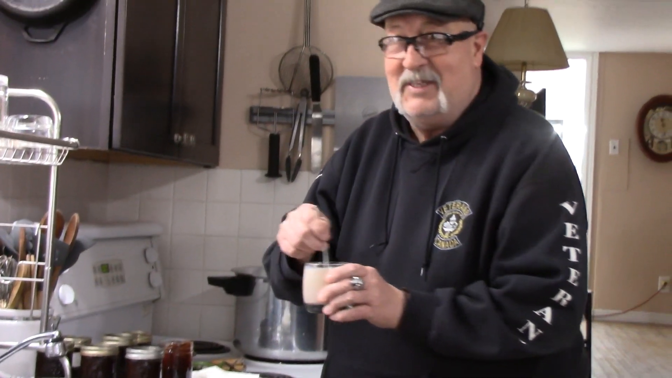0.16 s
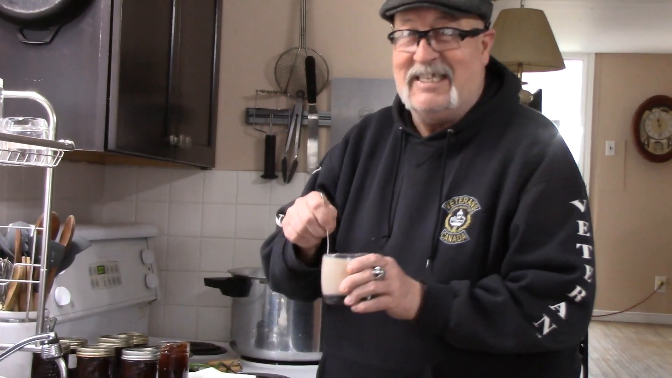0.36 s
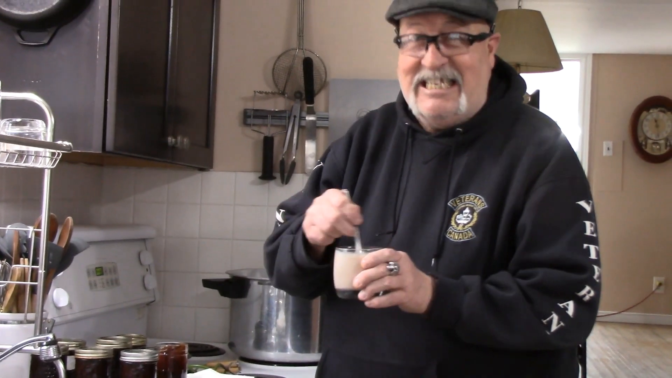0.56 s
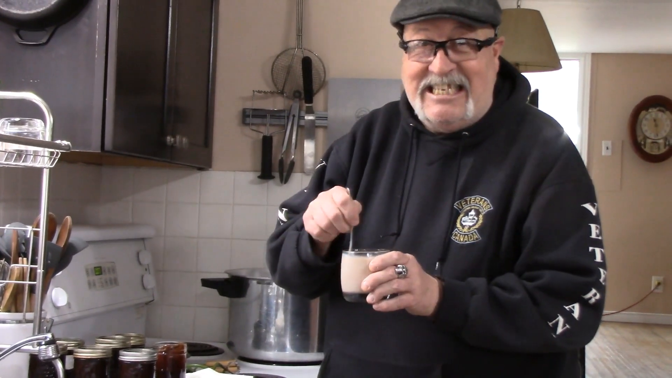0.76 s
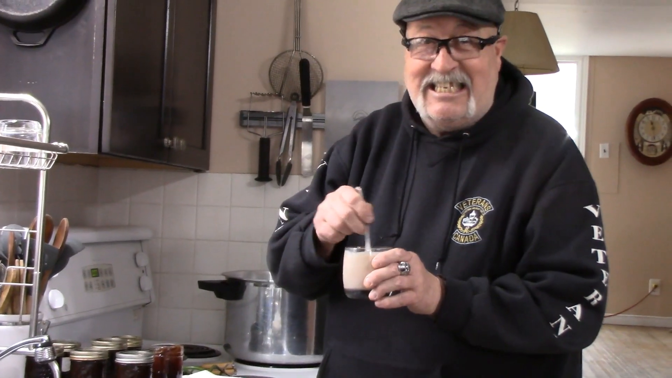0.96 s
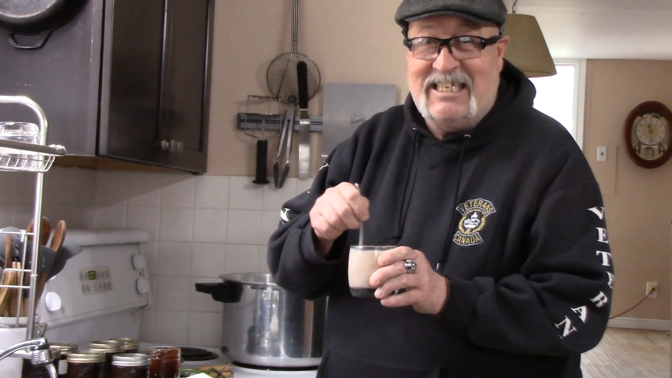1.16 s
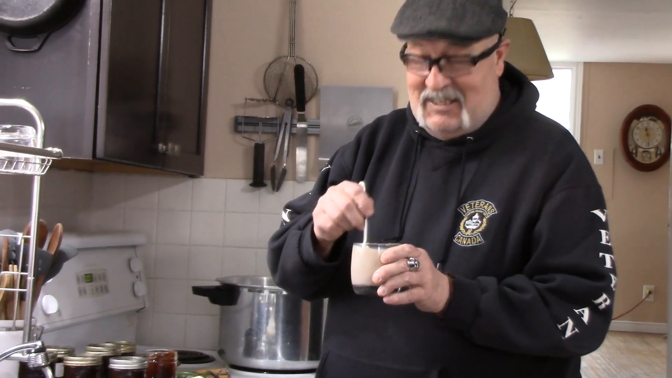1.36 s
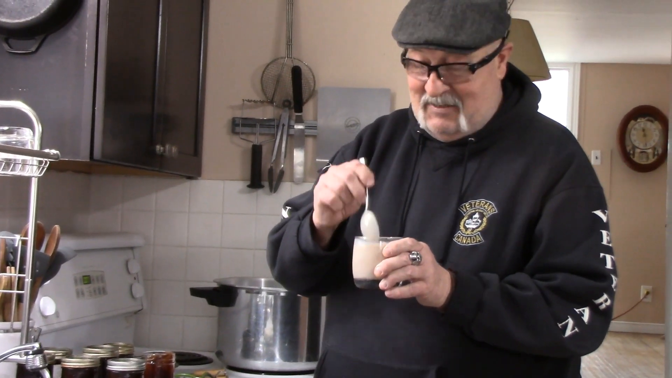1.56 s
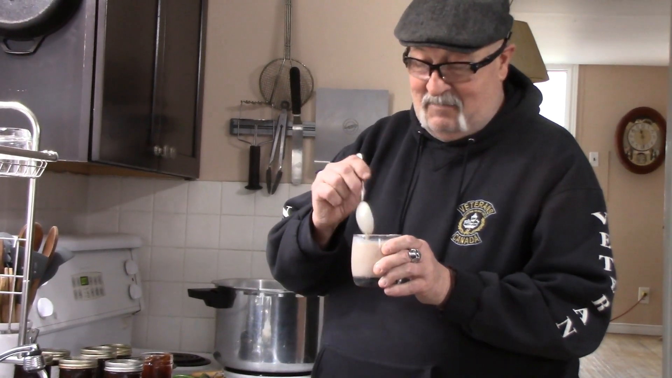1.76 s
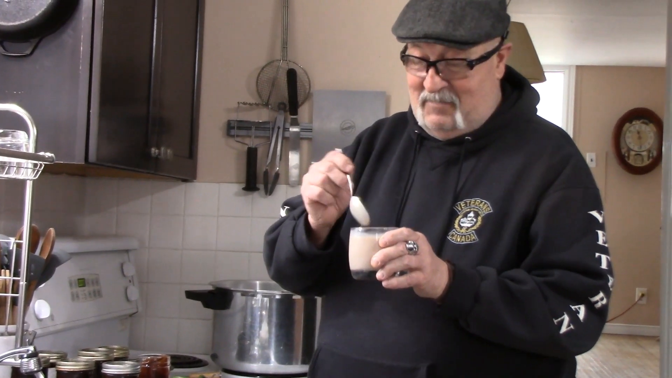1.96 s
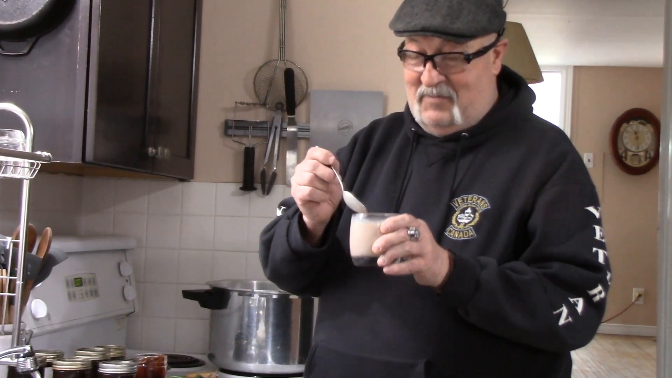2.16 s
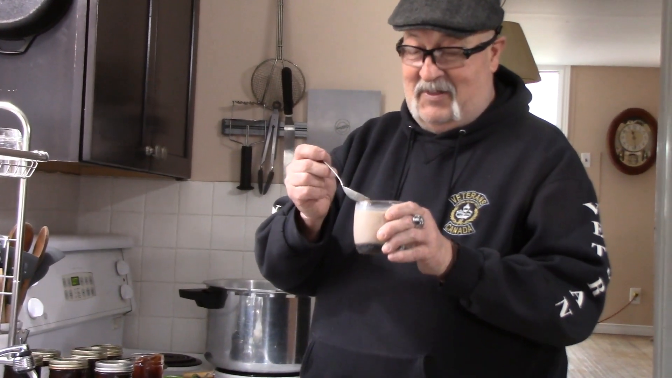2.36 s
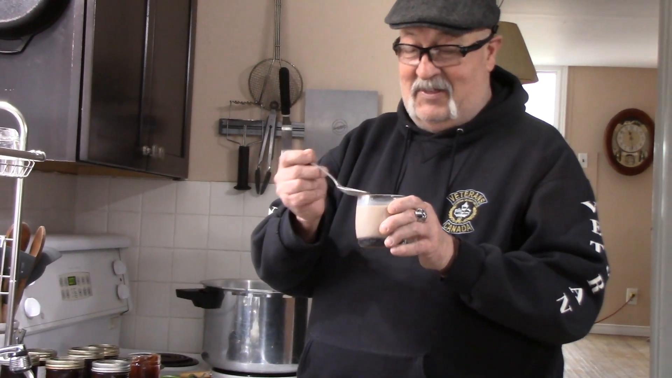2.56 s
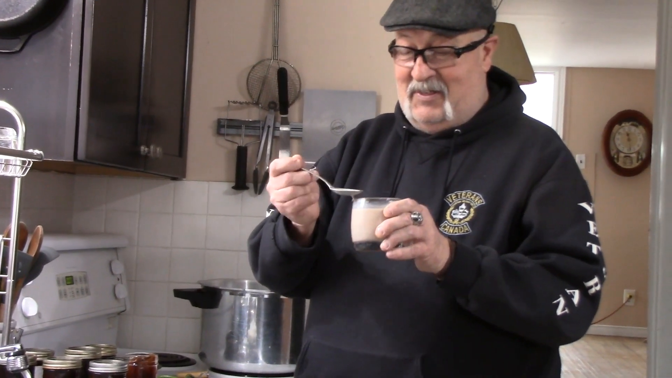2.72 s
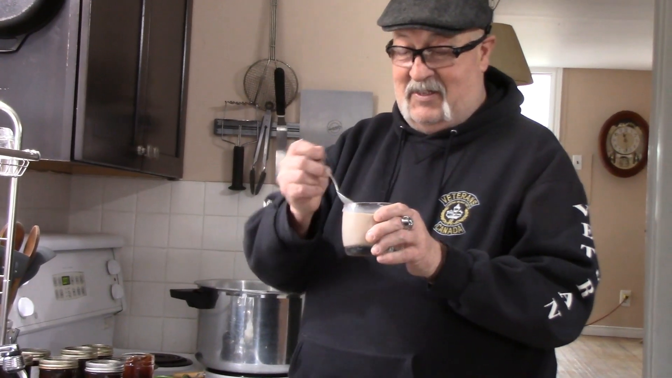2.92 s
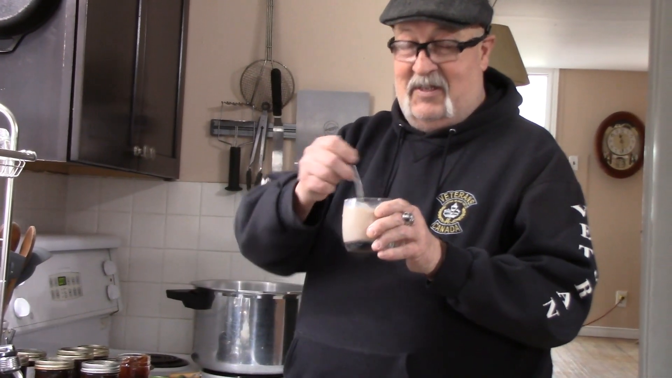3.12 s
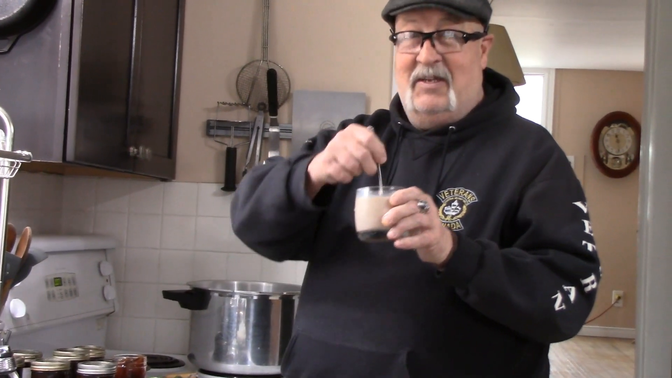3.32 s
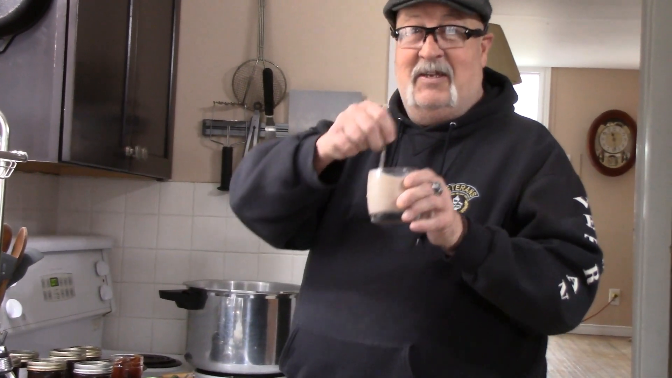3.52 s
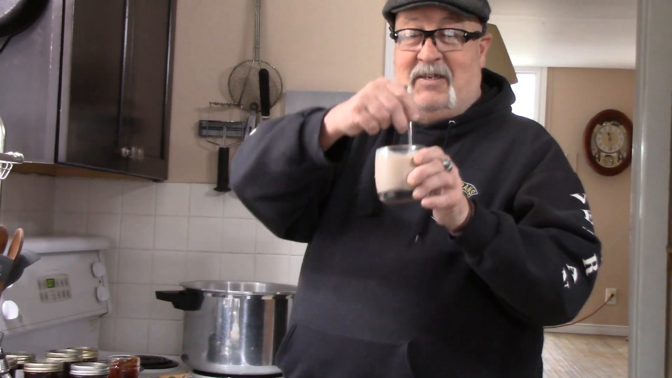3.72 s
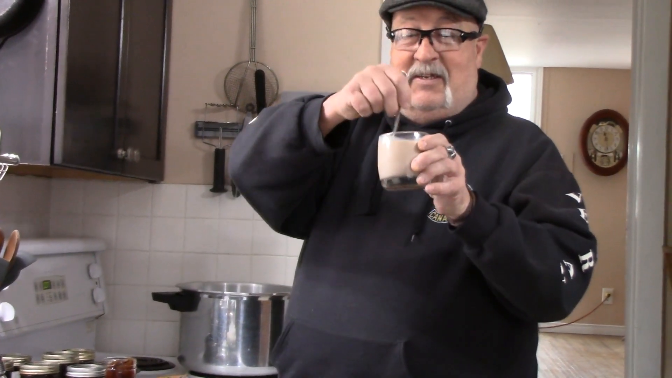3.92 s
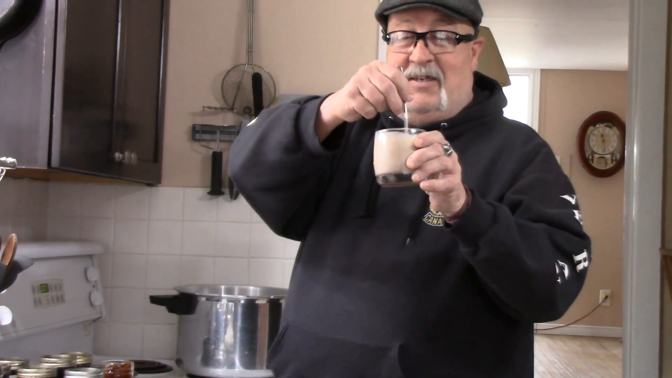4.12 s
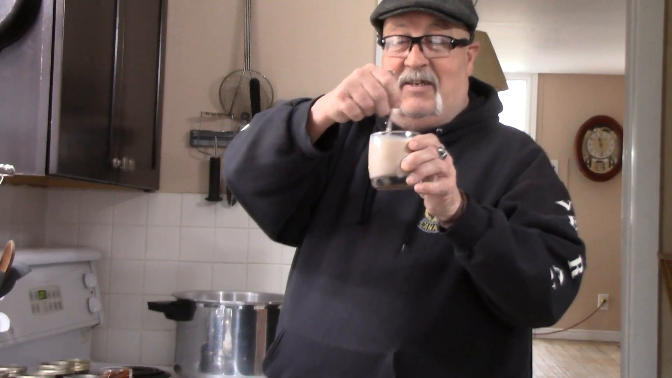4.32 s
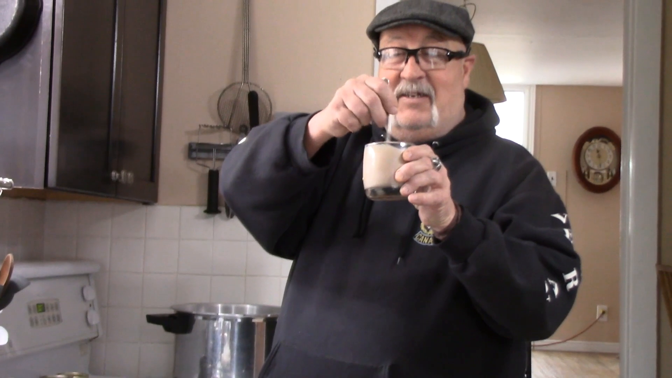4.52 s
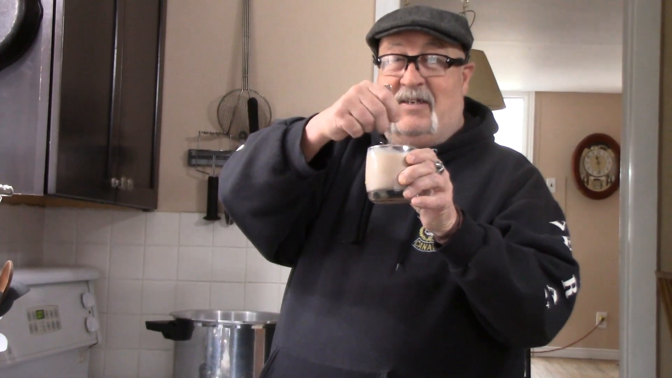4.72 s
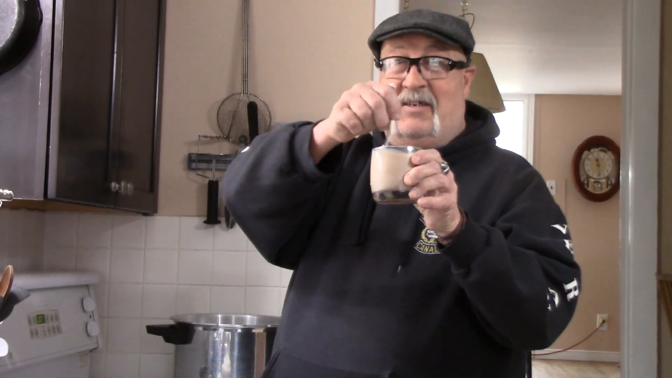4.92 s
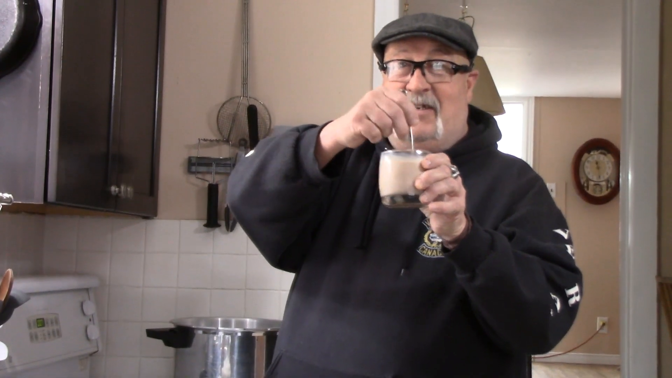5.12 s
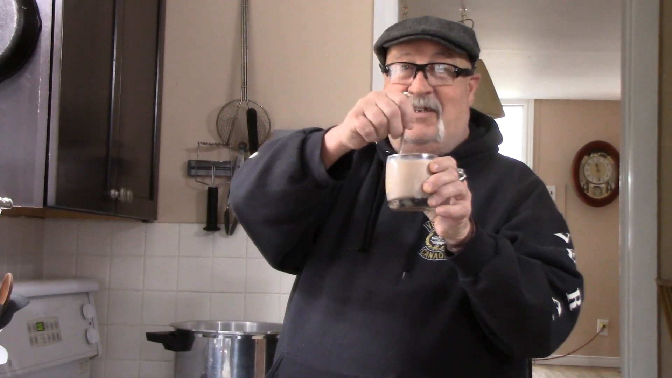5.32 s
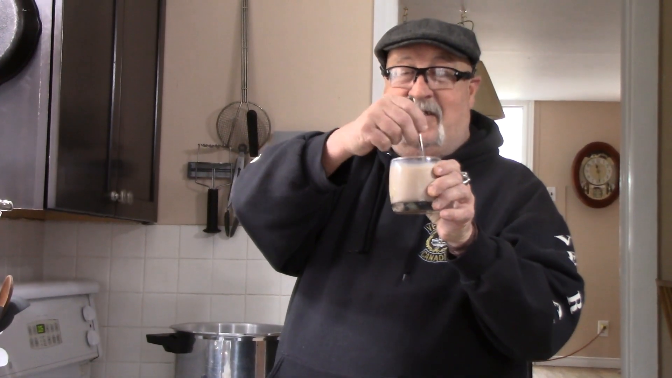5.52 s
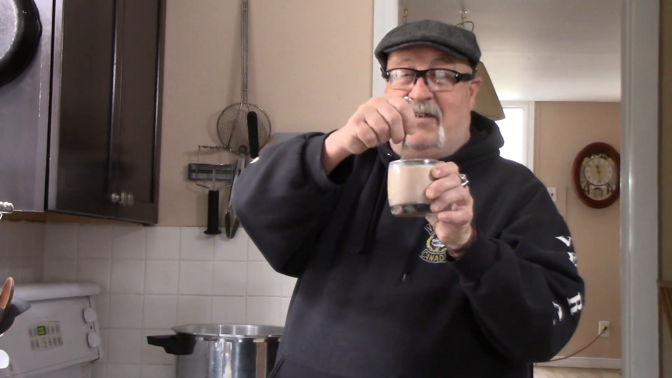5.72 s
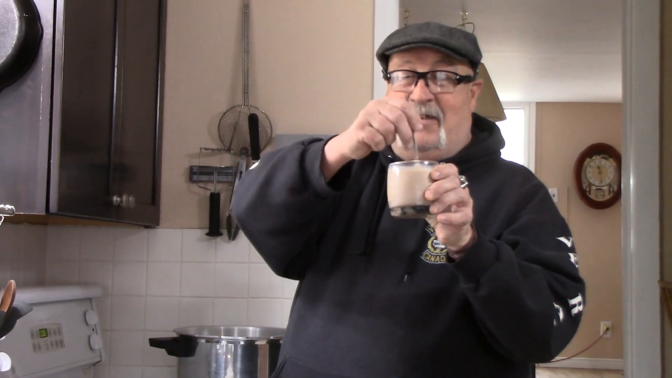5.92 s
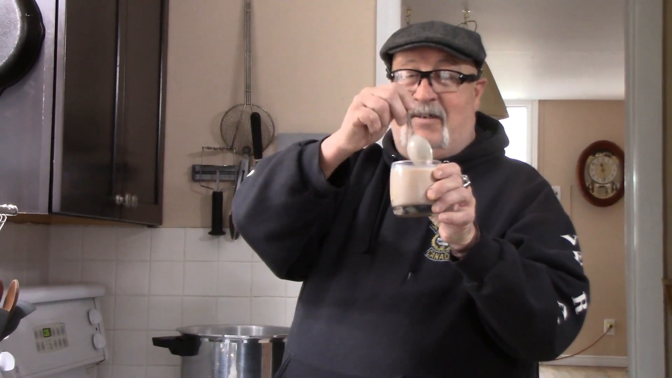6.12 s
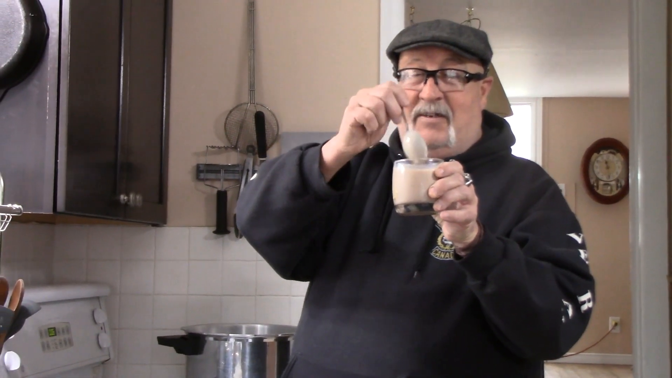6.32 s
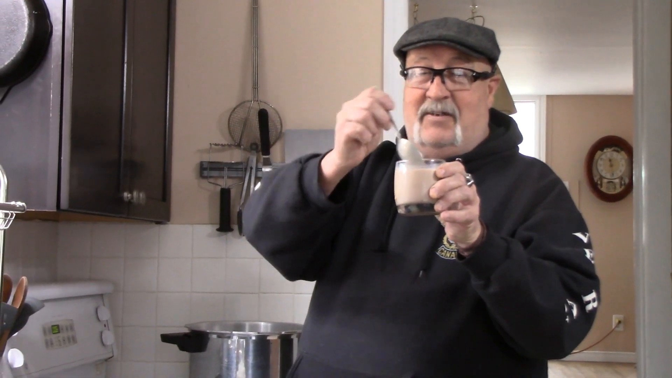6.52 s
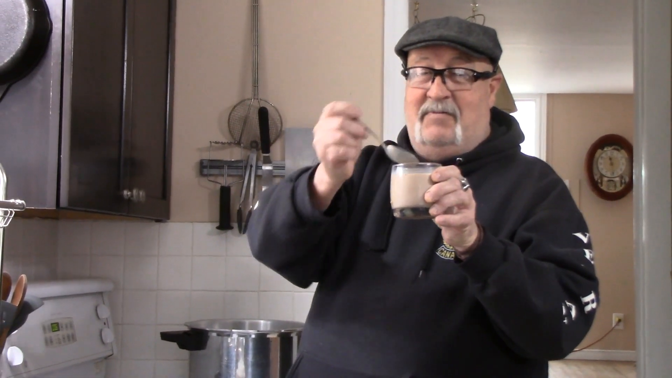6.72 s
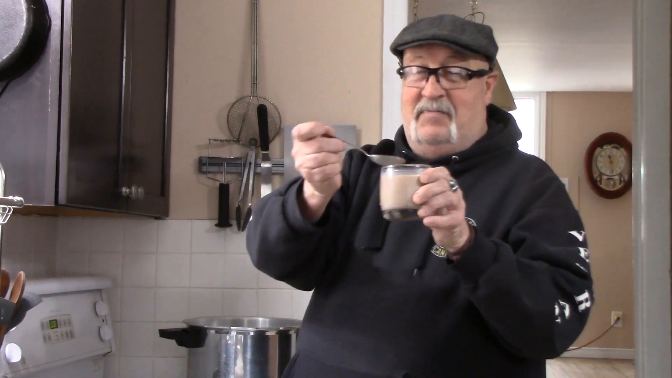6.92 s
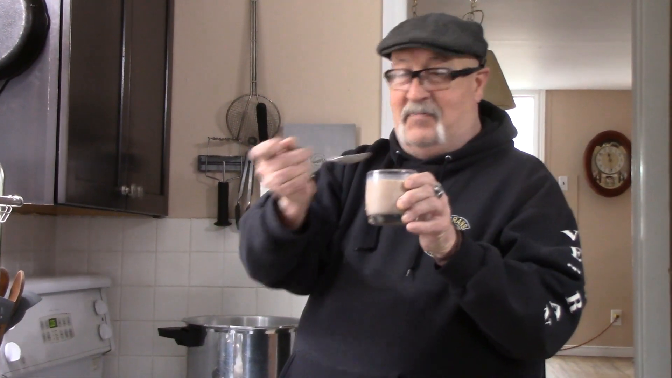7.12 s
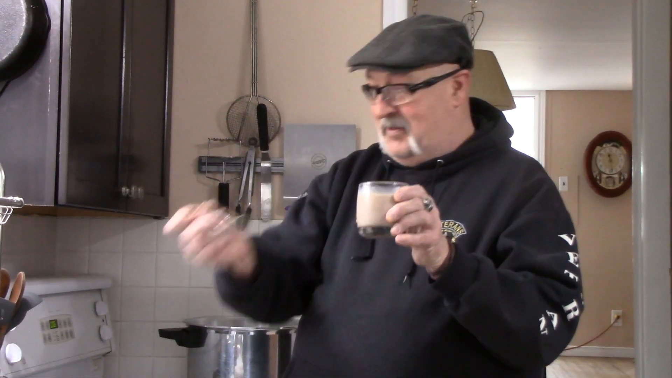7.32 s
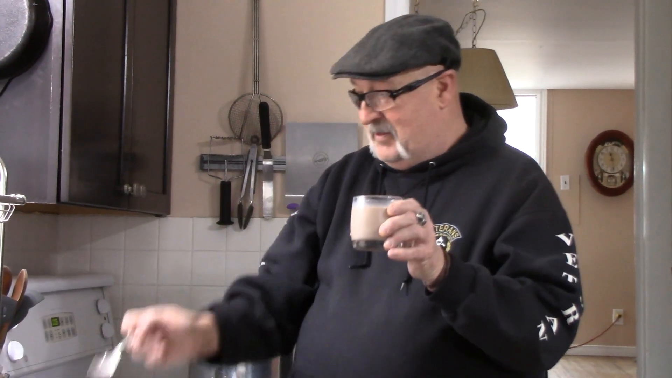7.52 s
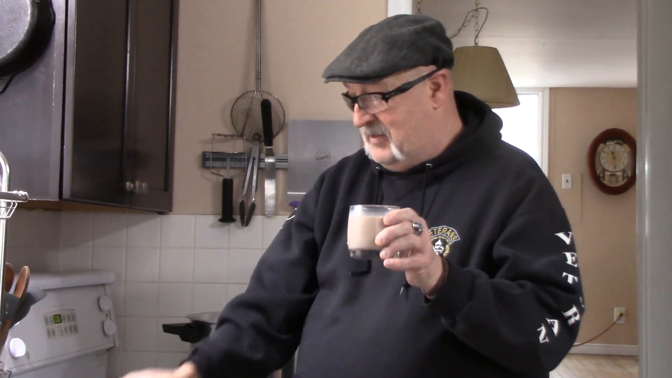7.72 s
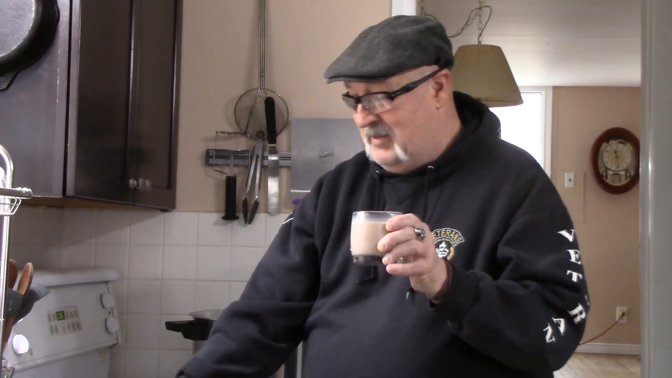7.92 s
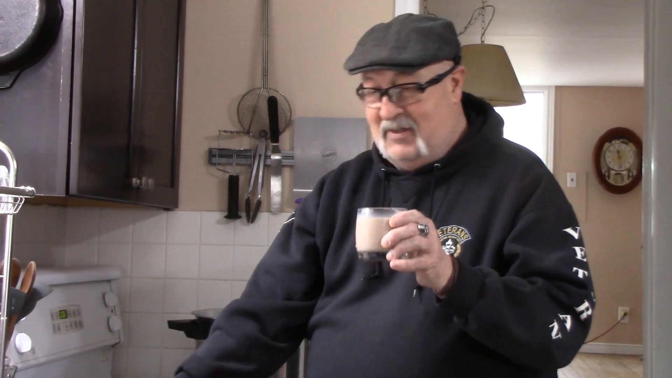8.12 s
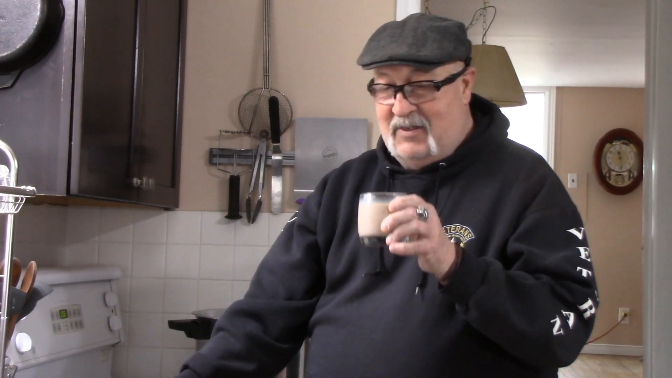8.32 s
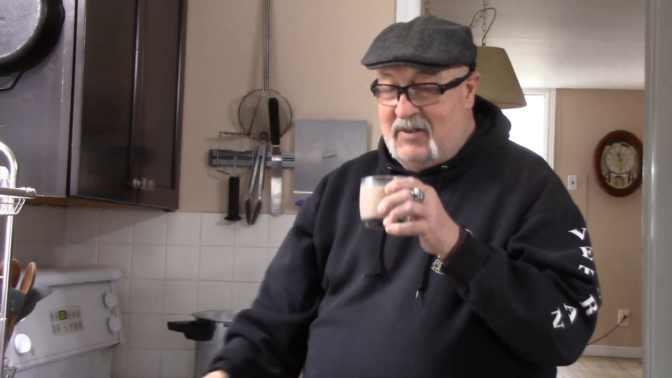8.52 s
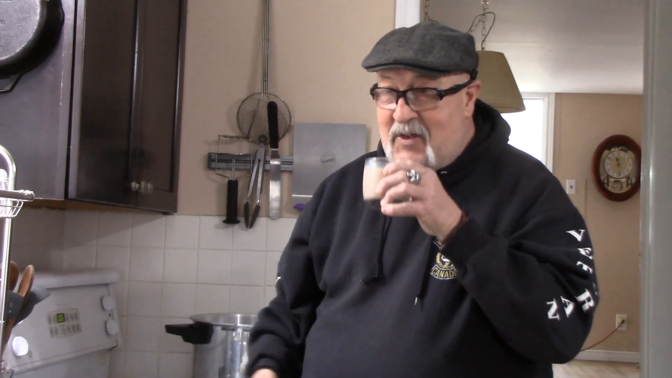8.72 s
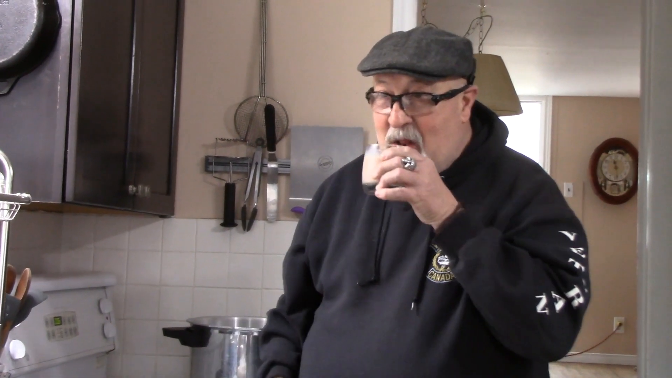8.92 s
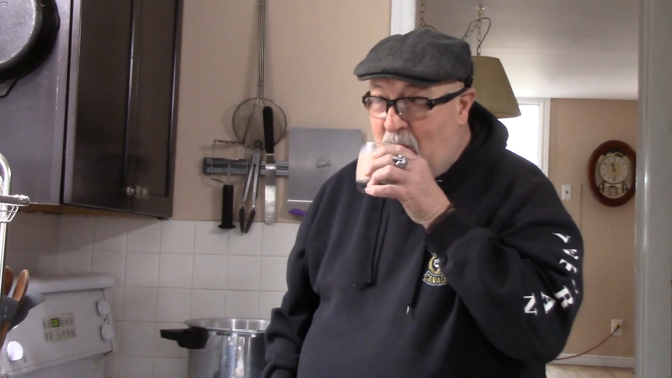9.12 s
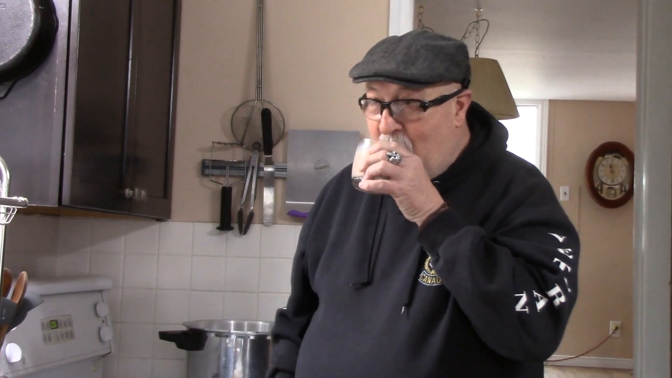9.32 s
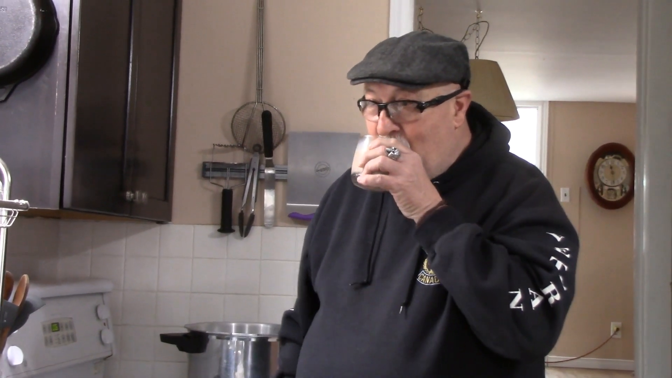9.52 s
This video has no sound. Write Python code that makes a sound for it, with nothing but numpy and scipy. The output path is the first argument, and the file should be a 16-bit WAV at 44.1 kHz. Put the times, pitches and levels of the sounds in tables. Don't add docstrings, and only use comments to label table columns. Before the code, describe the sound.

A metal spoon stirs a drink in a small glass with uneven ringing clinks, then clatters onto a sheet-metal top in a humming kitchen.

```python
import sys
import numpy as np
from scipy import signal
from scipy.fft import rfft, irfft, next_fast_len
from scipy.io import wavfile
from scipy.ndimage import uniform_filter1d

SR = 44100
rng = np.random.default_rng(int(sys.argv[2]) if len(sys.argv) > 2 else 0)


def gain_from_decibels(decibels):
    exponent = np.asarray(decibels, float) / 20
    return 10 ** exponent


def transcribe(u):
    v = np.clip(np.atleast_2d(u).T, -1, 1)
    q = np.round(v * 32767).astype(np.int16)
    wavfile.write(sys.argv[1], SR, q)


N = 426006


def evened(x):
    return x / np.sqrt(np.mean(x ** 2) + 1e-20)


def read(points, hz):
    f, value = np.transpose(points)
    return np.interp(np.log(hz + 1), np.log(f + 1), value)


def add(mix, s, sound):
    part = mix[round(s * SR):][:len(sound)]
    part += sound[:len(part)]


def above(x, hz):
    return signal.sosfilt(signal.butter(4, hz, "high", fs=SR, output="sos"), x)


def resonate(x, hz, width):
    return signal.lfilter(*signal.iirpeak(hz, hz / width, SR), x)


def body(drive, modes):
    return sum(gain_from_decibels(db) * evened(resonate(drive, f, w)) for f, w, db in modes)


def ring(t, hz, db, t60):
    return gain_from_decibels(db - 60 * t / t60) * np.sin(2 * np.pi * hz * t)


def held(db, hz, hold, t60):
    t = np.arange(8000) / SR
    level = gain_from_decibels(db - 60 * np.maximum(t - hold, 0) / t60)
    return level * np.sin(2 * np.pi * hz * t) * np.tanh(t / 0.0073)


def crack(db, t60=0.051):
    # pitch_hz, level_db
    colour = [(300, -20.5), (900, -20), (1500, -9.5), (3000, -7), (5000, -12.5), (9000, -19), (14000, -32),
              (16500, -45.5)]
    t = np.arange(2048) / SR
    z = rfft(rng.standard_normal(len(t))) * gain_from_decibels(read(colour, np.fft.rfftfreq(len(t), 1 / SR)))
    return evened(irfft(z)) * gain_from_decibels(db - 60 * t / t60)


def matching(table, s, usual):
    return next((row[1:] for row in table if abs(row[0] - s) < .012), usual)


def kitchen_air():
    # pitch_hz, level_db per Hz
    spectrum = [(15, -59), (25, -28), (114, -19), (146, -14), (252, -3), (288, -6.5), (358, 2), (389, -8.5),
                (809, -11), (1250, -17), (1510, -17), (2530, -23.5), (6040, -29), (15200, -42.5),
                (16500, -63.5)]
    # pitch_hz, level_db
    hum = [(118.4, -71.5), (258.4, -66), (360.7, -60.5), (829.0, -67), (1324, -72), (1550, -92)]
    # pitch_hz, likeness 0-1
    likeness = [(60, 0.85), (180, 0.96), (550, 0.91), (1650, 0.83), (4970, 0.8), (15000, 0.93)]
    frames, hz = N // 512 + 5, np.fft.rfftfreq(2048, 1 / SR)
    a, b, c, d, patches = rng.standard_normal((frames, 1025, 5)).T
    patches = evened(uniform_filter1d(uniform_filter1d(patches, 20, 0), 12, 1))
    same, left = np.clip(read(likeness, hz), -1, 1)[:, None], a + 1j * b
    z = np.array([left, same * left + np.sqrt(1 - same ** 2) * (c + 1j * d)])
    z *= gain_from_decibels(read(spectrum, hz)[:, None] + 1.0 * patches)
    air = gain_from_decibels(-52) * evened(signal.istft(z, nperseg=2048, noverlap=1536)[1][:, :N])
    t = np.arange(N) / SR
    for f, db in hum:
        drift = uniform_filter1d(rng.standard_normal(N // 100 + 1), size=50)
        waver = evened(uniform_filter1d(drift, size=50)).repeat(100)[:N]
        air += gain_from_decibels(db + 2 + 0.72 * waver) * np.sin(2 * np.pi * f * t + 1.54 * waver)
    return air


def room(x):
    # pitch_hz, t60_s
    decay = [(200, 0.77), (500, 0.25), (1500, 0.34), (4000, 0.37), (9000, 0.28), (15000, 0.17)]
    # pitch_hz, difference 0-1
    apart = [(100, .12), (300, .05), (700, .1), (1500, 0.076), (4000, 0.23), (9000, 0.2), (15000, 0.11)]
    span = 30000
    taps = np.zeros((2, span))
    at = np.arange(120, span - 20, 20) + rng.integers(0, 20, (2, (span - 121) // 20))
    np.put_along_axis(taps, at, rng.choice([-1., 1.], at.shape), 1)
    hz, t, z = signal.stft(taps, SR, nperseg=256)
    z[1] *= read(apart, hz)[:, None]
    mid, side = signal.istft(z * gain_from_decibels(-60 * t / read(decay, hz)[:, None]), SR, nperseg=256)[1]
    size = next_fast_len(N + span, True)
    tail = np.array([mid + side, mid - side]) / np.linalg.norm(mid)
    return irfft(rfft(x, size) * rfft(tail, size), size)[:, :N]


def touches():
    # start_s, level_db, pitch_hz, t60_s
    ticks = [(0.026, -38.5, 6070, 0.022), (0.057, -40, 2980, 0.005), (1.3866, -41.5, 6100, 0.011),
             (1.41, -52, 3730, 0.012), (1.449, -52.5, 2540, 0.0092), (1.6024, -43.5, 3250, 0.021),
             (1.714, -50, 2780, 0.012), (2.257, -46.5, 2840, 0.028), (3.2146, -55, 2930, 0.027),
             (6.5213, -62, 2620, 0.012), (6.538, -41, 5300, 0.0089), (6.5638, -47, 5070, 0.013),
             (8.029, -33, 3560, 0.0015)]
    # start_s, level_db, pitch_hz, t60_s
    drips = [(2.1021, -50, 9350, 0.004), (3.0194, -43, 8200, 0.0035), (3.107, -43, 10270, 0.0012),
             (6.541, -49, 10100, 0.004), (6.5889, -55, 8370, 0.004), (6.6154, -54, 10400, 0.004),
             (6.6478, -49, 10200, 0.004), (6.6937, -51, 9950, 0.004), (7.1616, -47, 10080, 0.0077),
             (8.027, -35, 8590, 0.003), (9.1017, -59, 11900, 0.0048)]
    # start_s, level_db, pitch_hz, width_hz, t60_s
    drags = [(1.234, -51, 5600, 298, 0.061), (1.601, -38.5, 2880, 250, 0.021), (3.33, -55.5, 604, 300, 1),
             (3.97, -36, 2900, 300, 0.043), (4.2, -56, 630, 300, 0.94), (4.435, -27.5, 1800, 500, 0.069),
             (4.451, -33, 1580, 200, 0.025), (4.464, -37, 1376, 60, 0.084), (4.523, -39.5, 1750, 300, 0.14),
             (4.681, -34, 3040, 248, 0.025), (4.699, -35, 3840, 252, 0.038), (4.991, -53, 6060, 200, 0.037),
             (5.14, -27, 2960, 500, 0.022), (5.563, -34.5, 3560, 300, 0.044),
             (6.515, -64.5, 4167, 3000, 0.31)]
    # pitch_hz, level_db, t60_s
    earlier = [(1800, -72, 0.77), (2380, -56, 0.11), (3950, -65, 0.26), (5500, -80, 0.28)]
    out, t = np.zeros(N), np.arange(6000) / SR
    for s, db, hz, t60 in ticks + drips:
        add(out, s, ring(t, hz, db - 6.0, np.clip(t60, .002, .2)))
    add(out, 0, sum(ring(t, *mode) for mode in earlier))
    for s, db, *_ in ticks:
        add(out, s, crack(db - 4, t60=0.0099))
    for s, db, hz, width, t60 in drags:
        grains = rng.standard_normal(len(t)) * (0.21 + (rng.random(len(t)) < 700 / SR) * 3.6)
        rub = resonate(resonate(grains, hz, width), hz, 2 * width)
        add(out, s, evened(rub) * gain_from_decibels(db - 60 * t / t60) * np.tanh(t / 0.0008))
    return out


def tumbling():
    spoon_hz = (3636, 5200, 6885, 8224, 9146, 10630)
    # level_db, t60_s, swell_s as the spoon turns to the microphone
    spoon = [(-10.5, 4, 0.006), (-18.5, 0.39, 0.003), (-28, 0.81, .02), (-12, .36, 0.0014),
             (-22, .15, .004), (-23.5, 0.55, 0.0036)]
    # start_s, stop_s, level_db
    flights = [(8.142, 8.22, -25), (8.339, 8.457, -4.5)]
    # depth_db, turn at which it faces the microphone 0-1
    turns, turns_per_s = [(1.5, 0.34), (4.5, 0.21), (8.2, .88), (1.7, 0.24), (2.5, .2), (4.5, .25)], 16
    out = np.zeros(N)
    for start, stop, free_db in flights:
        t = np.arange(0, stop - start + .1, 1 / SR)
        landed = gain_from_decibels(-60 * np.maximum(t - (stop - start), 0) / 0.04)
        facing_db = [depth * np.cos(2 * np.pi * (turns_per_s * t - turn)) for depth, turn in turns]
        rings = 0
        for hz, (db, t60, swell), facing in zip(spoon_hz, spoon, facing_db):
            rings = rings + ring(t, hz, db + free_db + facing, t60) * np.tanh(t / swell)
        add(out, start, landed * rings)
    return out


def sheet_tones():
    # start_s, level_db, pitch_hz, hold_s
    tones = [(8.145, -4.5, 813, .018), (8.17, -10, 790, 0.017), (8.208, -9, 750, 0.021),
             (8.148, -16, 2126, 0.014), (8.18, -17.5, 2110, 0.0092), (8.218, -16, 2130, 0.0082),
             (8.155, -25.5, 4194, 0.016), (8.24, -23.5, 1556, 0.028), (8.515, -28, 2444, 0.036),
             (8.285, -24, 2260, 0.042), (8.23, -25.5, 3100, .015), (8.362, -11.5, 931, 0.028),
             (8.362, -18, 2680, .05), (8.366, -23.5, 2200, 0.056), (8.438, -9, 786, .018),
             (8.474, -10, 786, 0.017), (8.46, -20.5, 3311, 0.031), (8.518, -16.5, 786, 0.0167)]
    out = np.zeros(N)
    for s, db, hz, hold in tones:
        add(out, s, held(db, hz, hold, t60=0.047))
    return out


def landing(modes, db, hz, spread, t60):
    t, signs = np.arange(5000) / SR, rng.choice([-1, 1], len(modes))
    rings = 0
    for sign, (f, *_) in zip(signs, modes):
        rings = rings + sign * ring(t, f, db - spread * abs(np.log2(f / hz)), t60)
    return rings * np.tanh(t / 0.0033)


def clatter():
    sheet_hz = (605, 702, 752, 785, 811, 882, 930, 1069, 1222, 1394, 1570, 2140, 2425, 2680, 2720, 2800,
                3100, 3307)
    # width_hz, level_db
    sheet_modes = [(13.93, -7.5), (12.9, -1), (14, -21), (12.9, -4.5), (15.06, -12.5), (15.1, -5),
                   (14.8, -7), (14, 2.5), (11.98, 1.5), (14, -0.5), (90, -1), (70, 19.5), (70.2, 6.5),
                   (20.1, -19), (19.85, -13), (30.1, -4), (40.1, 5.5), (19.98, -11)]
    # pitch_hz, width_hz, level_db
    counter = [(200, 40, -24), (255, 35.3, -27.5), (342.5, 13, 5.5), (444, 46, 9.5)]
    # start_s, low_sheet_db, around_hz, bright_part_db, around_hz
    blows = [(8.145, 2.5, 810, -12, 2130), (8.165, 2, 800, -42, 2200), (8.187, -1, 804, -28, 2090),
             (8.214, 4.5, 899, -17, 2130), (8.227, -12.5, 800, -25, 2130), (8.271, -3, 1000, -22.5, 2870),
             (8.29, -2.5, 676, -30, 2290), (8.333, -2.5, 840, -9.5, 3400), (8.364, 3.5, 947, -13, 2700),
             (8.385, -7, 930, -17, 2710), (8.409, 0, 880, -15, 2670), (8.422, -5, 907, -8.5, 2720),
             (8.439, 2, 750, -19, 2720), (8.464, -9, 847, -18, 3300), (8.477, 3.5, 766, -23, 3310),
             (8.5, -18, 855, -23, 3360), (8.52, -7, 780, -25, 2380)]
    # start_s, level_db, pitch_hz, t60_s
    thuds = [(8.335, -4, 377, 0.039), (8.431, -23, 255, 0.1), (8.489, -29, 154, 0.21),
             (8.548, -37, 335, 0.06)]
    chatter_db, chatter_t60 = (-18, -6.5, -4, -27.5), (0.12, 0.099, 0.048, 0.2)
    damped_s, damped_db = 8.24, -9
    out, sheet = np.zeros(N), [(f, *m) for f, m in zip(sheet_hz, sheet_modes)]
    low = [m for m in sheet if m[0] < 1800]
    upper = [m for m in sheet if m[0] > 1800]
    noise = rng.standard_normal(SR)
    contacts = rng.random(SR) < 250 / SR
    uneven_db = np.minimum(7.1 * rng.exponential(1, SR), 9.0)
    drive = noise * (0.081 + contacts * 2.8 * gain_from_decibels(uneven_db))
    rasp = resonate(rng.standard_normal(SR) + 0.24 * drive, 6500, 4870)
    first = blows[0][0]
    t = first + np.arange(SR) / SR
    lying = np.tanh(np.maximum(t - damped_s, 0) / .03)
    bright = gain_from_decibels(damped_db * lying) * body(drive, upper[:1]) + body(drive, upper[1:])
    voices = np.array([evened(x) for x in (body(drive, low), bright, rasp, body(drive, counter))])
    power = np.zeros(voices.shape)
    for s, low_db, low_hz, bright_db, upper_hz in blows:
        since = np.maximum(t - s, 0)
        start_db = np.add(chatter_db, [low_db, bright_db, bright_db, low_db])[:, None]
        fading = gain_from_decibels(start_db - 60 * since / np.array(chatter_t60)[:, None])
        power += (fading * np.tanh(since / 0.0011)) ** 2
        burst = crack(bright_db - 4, t60=0.15)
        add(out, s, burst * np.tanh(np.arange(len(burst)) / SR / .0025))
        add(out, s, landing(low, low_db - 11.0, low_hz, spread=25.4, t60=0.073))
        add(out, s, landing(upper, bright_db - 3.5, upper_hz, spread=72, t60=0.037))
    add(out, first, (np.sqrt(power) * voices).sum(0))
    t = np.arange(8000) / SR
    for s, db, hz, t60 in thuds:
        add(out, s, ring(t, hz, db, t60) * np.tanh(t / 0.0028))
    return above(out, 190)


def clink(s, db, pitch_hz, hard, height):
    plain_db = (17.6, 12.8, 7.9, 13.6, 6.97, 4.5, 22.3, 3.4)
    hard_db = (-3, 0.5, 0.5, 1.5, 13, 15, 1.5, -3)
    height_db = (1.34, -4, 3.5, -1, -4, 0.5, -0.25, -0.5)
    wall_t60 = (0.13, 0.18, 0.15, 0.1)
    # start_s, first_hz, second_hz, third_hz, fourth_hz
    tunings = [(0.2015, 1648, 2353, 4000, 5985), (0.4194, 1634, 2380, 3995, 6040),
               (0.6073, 1667, 2376, 3950, 5960), (0.76, 1640, 2400, 3875, 5980),
               (0.881, 1626, 2341, 3943, 5895), (1.0204, 1660, 2357, 3850, 6021),
               (1.0488, 1658, 2402, 3984, 6010), (1.2295, 1605, 2357, 3850, 5840),
               (2.3341, 1720, 2487, 4130, 6250), (2.857, 1747, 2514, 4246, 6310),
               (3.317, 1712, 2531, 4260, 6350), (3.478, 1640, 2340, 4182, 6400),
               (3.7892, 1698, 2425, 4050, 6000), (3.9679, 1682, 2430, 3900, 5930),
               (4.017, 1676, 2500, 4070, 6200), (4.2373, 1690, 2446, 4091, 6100),
               (4.4328, 1650, 2425, 3956, 6000), (4.6767, 1672, 2414, 3950, 6110),
               (4.8794, 1674, 2310, 3924, 5820), (5.1358, 1660, 2380, 3960, 5910),
               (5.181, 1680, 2414, 3960, 6013), (5.3651, 1660, 2472, 4060, 6130),
               (5.5637, 1687, 2403, 4060, 5920), (5.685, 1630, 2330, 3920, 5780),
               (5.7654, 1623, 2419, 3946, 5935), (6.7327, 1707, 2520, 4140, 6255)]
    # pitch over the pitch unit, level_db, t60_s
    top, highest = [(1.95, -31, 0.029), (2.05, 4, 0.019), (2.13, -6.5, 0.047), (2.33, -11, 0.017),
                    (2.412, 3, 0.02)], [(2.758, -17, 0.047), (3.01, -13.5, 0.026)]
    # start_s, build_up_s, lowest_db, second_db, fourth_db
    odd_blows = [(.201, 0.0019, 1, 2, -0.5), (.42, 0.0028, -4, 2, -0.5), (.607, 0.0033, -2.5, 2, -5.5),
                 (.881, 0.0075, -5.5, 0.5, 4), (1.049, 0.0026, -1.5, 4, -7.5), (1.23, 0.0021, 0, -1.5, 4),
                 (2.334, 0.0019, -0.5, 2, -2), (2.856, 0.0022, -0.5, 0, -5.5), (3.316, 0.0016, 1, 5, -6.5),
                 (3.79, 0.005, -10.5, -0.5, -6.5), (4.239, 0.0031, -6.5, 2.5, -9),
                 (4.677, 0.0081, -0.5, -4.5, -2), (4.88, 0.0009, -1, 10.5, -6.5),
                 (5.136, 0.0041, -6.5, -3, -2), (4.017, 0.004, 0.1, 3, 0.5),
                 (5.365, 0.0047, -18.5, -4.5, -0.5), (5.562, 0.0042, -2.5, -0.5, -4),
                 (5.765, 0.0049, -3.5, 5, 10.5), (6.733, 0.0022, 5, 9.5, 5.5)]
    # start_s, level_db
    third_mode = [(.201, 1), (.42, 2.5), (.607, 4.5), (1.049, -0.5), (2.334, 1.5), (2.856, 3), (3.316, 3.5),
                  (3.79, 2.5), (3.968, -3.5), (4.017, 1), (4.433, 0.5), (5.136, 8.5), (5.365, -2.5),
                  (5.562, 1), (5.765, 1), (6.733, 0.5)]
    # start_s, ring length factor, top_modes_db, contact_crack_db, fizz_db
    grips = [(.201, 1.65, -3.5, 1.5, -6), (.42, 1.05, 6, 3.5, -5), (.607, 1.4, -2, -2, -7),
             (.881, 2.3, 2, 8.5, 4.5), (1.049, 1.43, -0.5, 2, -5), (1.23, 1.9, 1, 4, 5),
             (2.334, 2.03, 5, 6, -3), (2.856, 1.04, -1, -2.3, -5), (3.316, 1.36, 3.5, 1.8, 11),
             (3.478, 0.46, 16, 5.5, 6.5), (3.79, 0.66, 2.5, -0.3, -4), (3.968, 0.98, -1, -1, -9),
             (4.017, 0.71, .1, 4, .1), (4.239, 1.2, 3, 5.5, 7), (4.433, 1.35, -1, 2.5, -7),
             (4.677, 1.87, 1, 7, -6), (4.88, 0.66, 7, 3.5, 3), (5.136, 1.1, 7, 7.5, -7),
             (5.181, 2.4, -4, 0, 4), (5.365, 1.7, -7.5, 1.2, -6), (5.562, 1.9, 0.5, 7.5, -13),
             (5.765, 1.15, 5, 2, -8), (6.733, 1.05, 0, 1.7, -5)]
    slosh_share, slosh_per_s = .007, 9
    layers_db = db + np.add(plain_db, hard * np.array(hard_db) + height * np.array(height_db))
    *wall_db, top_db, highest_db, crack_db, knock_db = layers_db
    build, low_db, second_db, fourth_db = matching(odd_blows, s, (0.0011, 0, 0, 0))
    third_db, = matching(third_mode, s, (0,))
    longer, more_db, rough_db, fizz_db = matching(grips, s, (1, 0, 0, 0))
    build = max(build, .0005)
    wall_db = np.add(wall_db, [low_db, second_db, third_db, fourth_db])
    wall_hz = min(tunings, key=lambda row: abs(row[0] - s))[1:]
    top_db, crack_db = top_db + more_db, crack_db + rough_db
    t = np.arange(SR // 3) / SR
    modes = [(hz, d, longer * t60) for hz, d, t60 in zip(wall_hz, wall_db, wall_t60)]
    modes += [(ratio * pitch_hz, top_db + d, t60) for ratio, d, t60 in top]
    modes += [(ratio * pitch_hz, highest_db + d, t60) for ratio, d, t60 in highest]
    modes += [(1290, knock_db + 3.0, 0.002), (1898, knock_db + 10.5, 0.019)]
    split = rng.uniform(-1.01, 1, (len(modes), 2))
    voices = []
    for (hz, d, t60), (apart, weak) in zip(modes, split):
        slosh, start = 2 * np.pi * slosh_per_s * (1 + .5 * weak), np.pi * (apart + weak)
        bent = t + slosh_share / slosh * (np.sin(slosh * t + start) - np.sin(start))
        pair = ring(bent, hz, d, t60) + ring(bent, hz * (1 + 0.041 * apart), d - 12 + 4 * weak, t60)
        pair += ring(bent, hz * (1 - 0.02 * np.sign(apart) * (1 + .5 * weak)), d - 16.5, t60)
        grip = gain_from_decibels(-495 * t ** 2)
        voices.append(pair * grip * np.tanh(t / build * (hz / modes[0][0]) ** 1.21))
    wall, sound = sum(voices[:len(wall_hz)]), sum(voices[len(wall_hz):])
    contact = crack(crack_db - 11.0)
    add(sound, 0, contact * np.tanh(t[:len(contact)] * 0.9 / min(build, .006)))
    add(sound, 0, above(crack(highest_db + fizz_db + 12.0, t60=0.049), 12300))
    return wall, sound


def stirring():
    # start_s, strength_db, top-mode pitch unit_hz, hardness -3..3, height on the wall -3..3 (0 is
    first_stir = [(0.2015, -37.5, 3970, 0.75, -0.052), (0.4194, -45.5, 3940, 0.08, 1.54),
                  (0.6073, -32, 4045, 0.25, 0.39), (0.76, -59.5, 3995.0, -3, -0.69),
                  (0.881, -50.5, 4000, -0.35, -1.3), (1.0204, -59.5, 4030, -1.2, 0.2),
                  (1.0488, -34, 4050, 0.48, 0.33), (1.2295, -57, 3920, -0.05, -1)]
    second_stir = [(3.317, -37.5, 4110, -0.56, -0.46), (3.479, -60.5, 3880, -1.7, 0.1),
                   (3.789, -34, 4090, 0.067, 0), (3.968, -43, 3820, 0.98, 2.2),
                   (4.017, -43.5, 4170, -0.44, 0.5), (4.237, -51, 4030, -0.85, -0.2),
                   (4.4331, -43.5, 3950.0, 0.82, 1.3), (4.6763, -46, 4010, 0.26, -0.96),
                   (4.8809, -56, 3880, -1.3, -0.5), (5.1356, -50, 3940, -0.1, 0.05),
                   (5.181, -56, 3975, -0.5, 0.5), (5.3651, -34, 4030, 0.75, 0.04),
                   (5.563, -45, 4060, 0.73, 0.15), (5.685, -64, 3920, -1.3, -2.5),
                   (5.7655, -39.5, 3975, 0.86, 3)]
    rim_taps = [(2.3344, -44, 4100, -0.85, 0.37), (2.857, -31.5, 4080, -0.1, 0.85),
                (6.733, -37.5, 4120, 0.69, 1.45)]
    # start_s, level_db, pitch_hz, t60_s
    early_spots, late_spots = [(0.203, -25.5, 1910, 0.024), (.205, -44, 5080, .08),
                               (0.204, -25.5, 5910, 0.031), (0.608, -26, 4780, 0.022),
                               (0.613, -28, 3280, .04), (.884, -49, 5100, .05), (1.05, -21.5, 3120, 0.034),
                               (1.053, -25.5, 6120, 0.041), (1.231, -42, 8100, .015),
                               (1.234, -40, 5740, 0.063), (1.235, -41, 5540, .06),
                               (2.856, -20.5, 3620, 0.019), (3.129, -53, 1434, .03),
                               (3.221, -43, 1230, 0.017), (3.316, -25, 1850, 0.031),
                               (3.318, -40, 5900, .08), (3.479, -44, 5700, 0.058),
                               (3.479, -37, 2230, 0.033)], [(3.968, -31.5, 1910, 0.028), (3.969, -28, 5630, 0.037),
                                                    (3.969, -36, 4820, .035), (3.969, -28, 2910, .03),
                                                    (3.969, -28, 2220, 0.035), (4.017, -30, 2270, .025),
                                                    (4.03, -52, 3030, .02), (4.24, -39, 2505, 0.033),
                                                    (4.436, -30, 2950, 0.034), (4.434, -27.5, 1890, .03),
                                                    (4.453, -25, 1660, 0.022), (4.47, -40, 1340, 0.066),
                                                    (4.53, -41, 1780, .04), (4.682, -26, 3050, 0.035),
                                                    (4.7, -31.5, 3620, 0.044), (4.682, -37, 5150, 0.11),
                                                    (4.881, -20.5, 1590, 0.011), (5.0, -44.5, 2450, 0.07),
                                                    (5.136, -27.5, 2090, 0.038), (5.148, -21, 2390, 0.019),
                                                    (5.366, -20, 5050, 0.037), (5.562, -21.5, 3270, 0.013),
                                                    (5.562, -30.5, 5100, 0.037),
                                                    (5.763, -27.5, 3140, 0.021), (6.733, -25, 1920, 0.037),
                                                    (8.027, -40.5, 2210, 0.027),
                                                    (8.026, -45.5, 3330, 0.029)]
    # start_s, level_db, pitch_hz, hold_s, t60_s
    pressed = [(5.366, -17, 1682, 0.04, .13), (3.79, -27, 1672, 0.051, .12),
               (4.239, -27.5, 5160, .012, 0.05), (5.372, -33, 2480, 0.032, .07),
               (6.736, -23, 2505, 0.032, .14)]
    sway_hz, sway_per_s = 45, 13
    walls, out, t = np.zeros((3, N)), np.zeros((3, N)), np.arange(4000) / SR
    for k, row in enumerate([*first_stir, *second_stir, *rim_taps]):
        wall, rest = clink(*row)
        add(walls[k % len(out)], row[0], wall)
        add(out[k % len(out)], row[0], rest)
    for s, db, hz, t60 in early_spots + late_spots:
        pair = ring(t, hz, db, t60) + ring(t, hz * 1.012, db - 8, t60)
        add(walls[1], s, gain_from_decibels(3.0) * pair * np.tanh(t / .002))
    for s, *tone in pressed:
        add(walls[0], s, held(*tone))
    turn = 2 * np.pi * np.arange(N) / SR
    sway = np.sqrt(2) * np.cos(sway_hz * turn + 2 * np.sin(sway_per_s * turn))
    to_room = out + gain_from_decibels(-8) * walls * (1 + sway) / np.sqrt(2)
    return above((out + walls).sum(0), 290), above(to_room, 360)


def scene():
    (glass, near), small = stirring(), touches()
    near[0] += small
    drop, spoon, tones = clatter(), tumbling(), sheet_tones()
    direct = gain_from_decibels(1.5) * (glass + small) + gain_from_decibels(0.5) * drop + tones + gain_from_decibels(2.5) * spoon
    lead = .12 * np.gradient(direct) * [[1], [-1]]
    fallen = drop + gain_from_decibels(-10.5) * spoon + gain_from_decibels(-11.5) * tones
    wet = gain_from_decibels(2.5) * sum(room(x) for x in near) + gain_from_decibels(-2.5) * room(fallen)
    return (direct + lead + wet + kitchen_air()) * gain_from_decibels([[.2], [-.2]])


def band_limit(x):
    return signal.sosfilt(signal.butter(12, 16790, fs=SR, output="sos"), x)


def record(dry):
    power_db = 10 * np.log10(abs(uniform_filter1d((dry ** 2).mean(0), 300)) + 1e-12)
    fall = np.arange(N) * 60. / SR
    over_db = np.maximum(np.maximum.accumulate(power_db + fall) - fall + 17.5, 0)
    x = dry / gain_from_decibels(0.11 * uniform_filter1d(over_db, 100))
    low_pass = signal.firwin(255, 16100, window=("kaiser", 9), fs=SR)
    x = signal.oaconvolve(.9 * np.tanh(x / .9), low_pass[None], "same")
    return band_limit(x)


dry = scene()
out = record(dry)
transcribe(out)
```